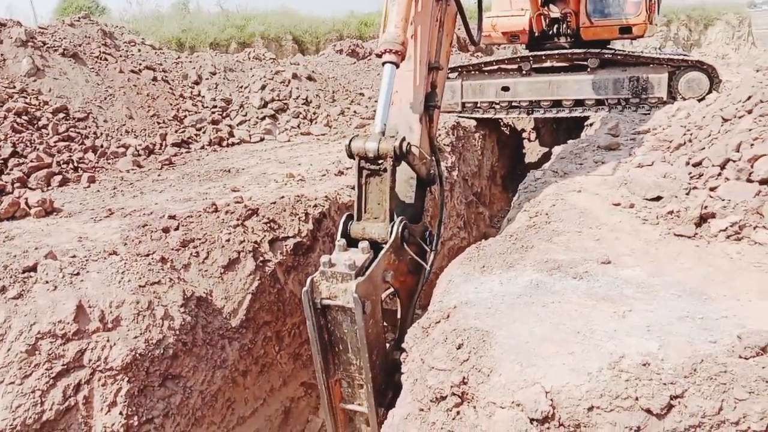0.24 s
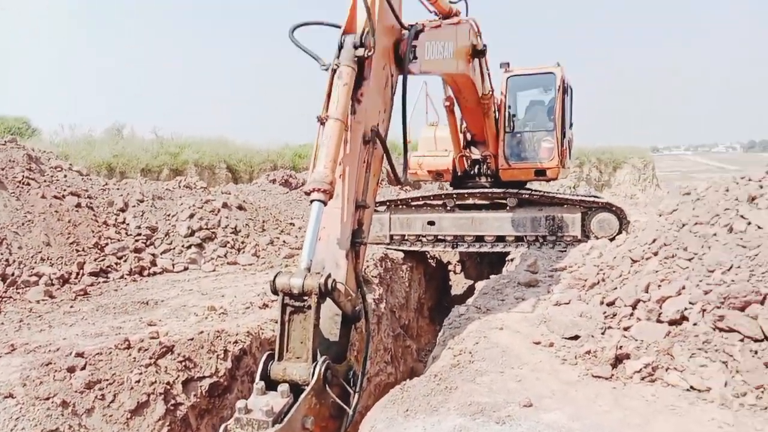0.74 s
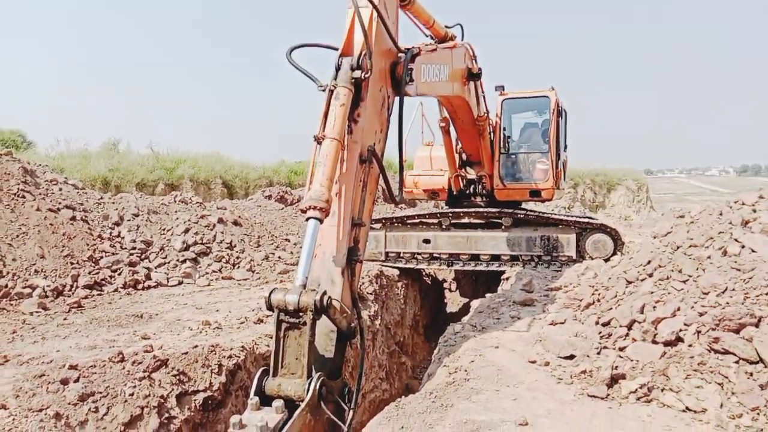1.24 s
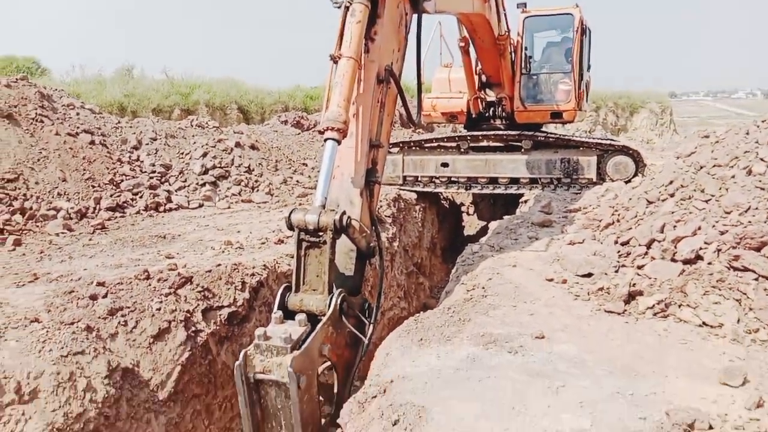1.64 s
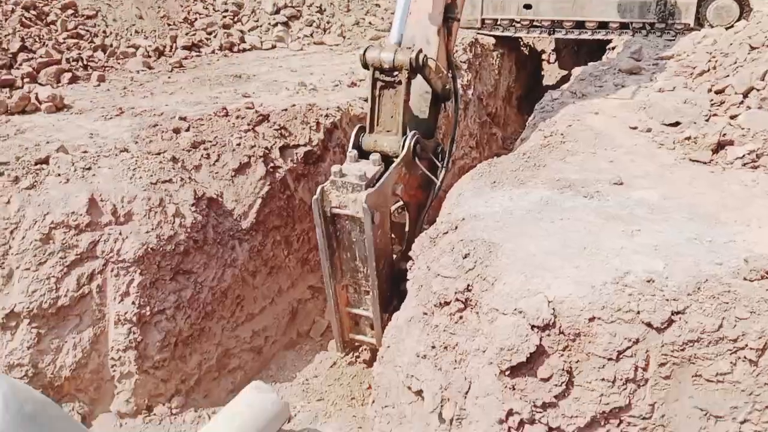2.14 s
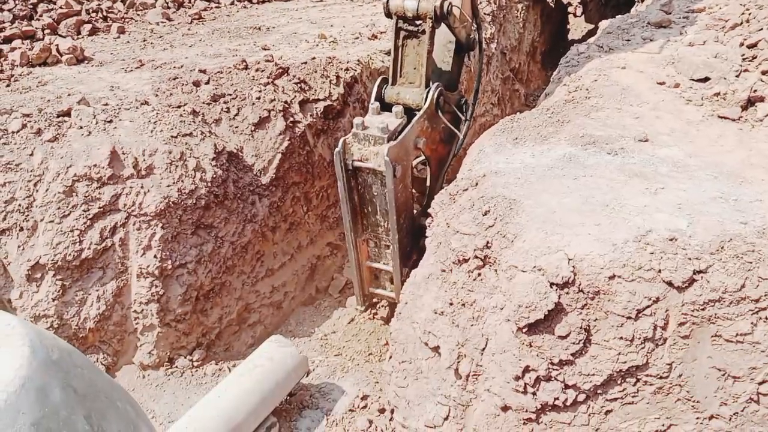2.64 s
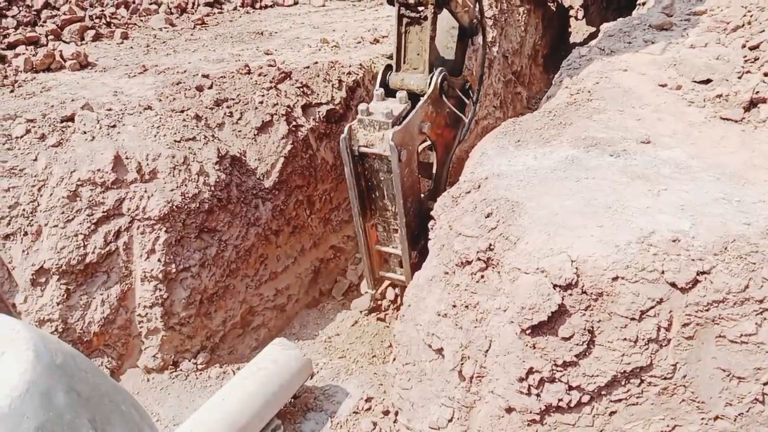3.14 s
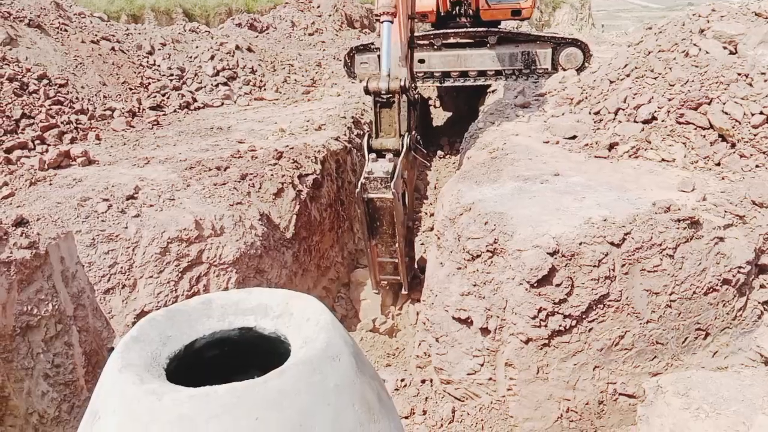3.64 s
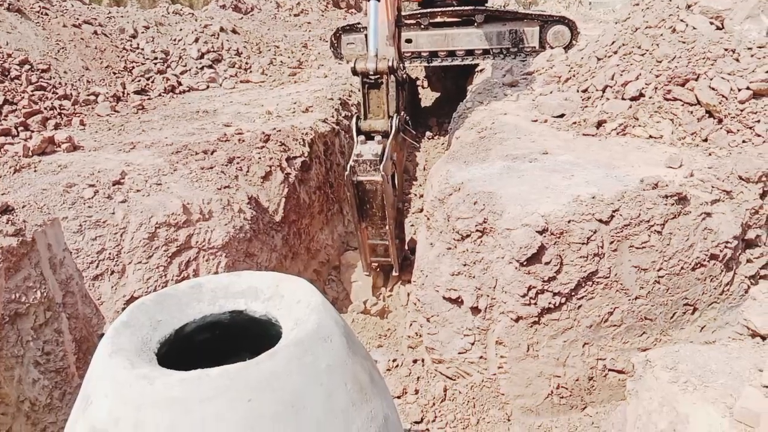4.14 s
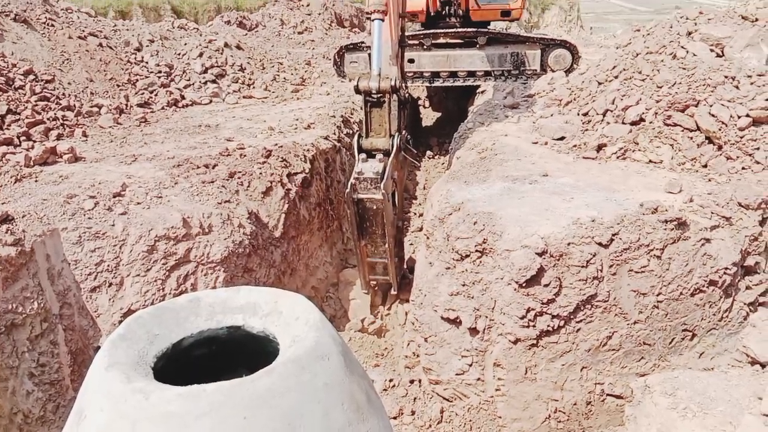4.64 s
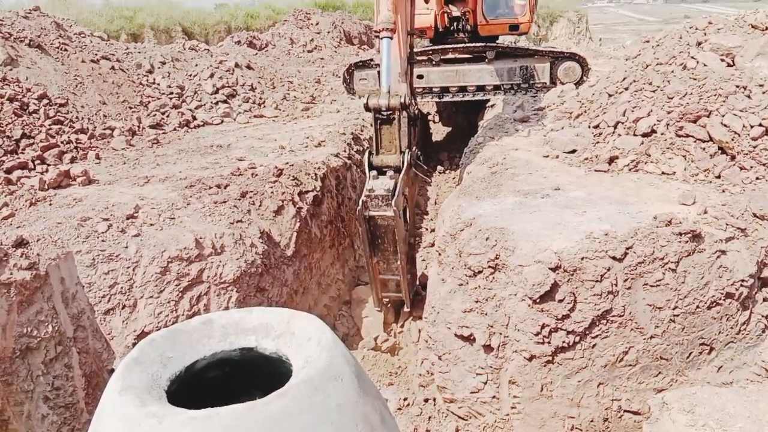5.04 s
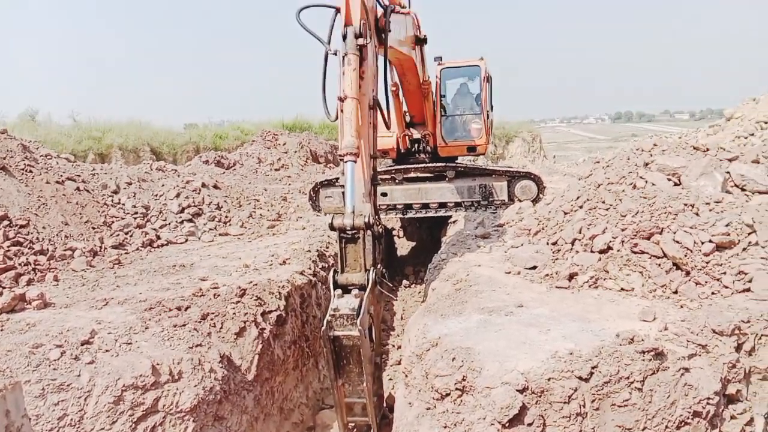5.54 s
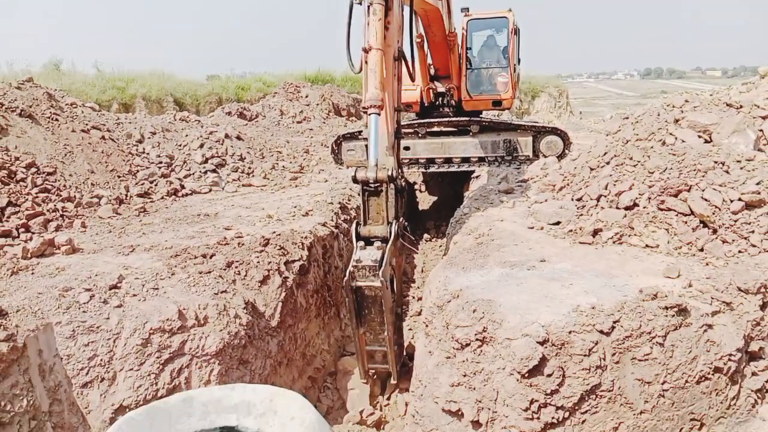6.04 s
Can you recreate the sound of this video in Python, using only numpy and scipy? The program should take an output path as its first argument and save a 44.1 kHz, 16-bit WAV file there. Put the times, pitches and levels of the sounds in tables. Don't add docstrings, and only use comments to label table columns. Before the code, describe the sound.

Rapid, regular hammering of a steel chisel on rock, harsh and distorted on a small close microphone outdoors. Each stroke is a clack and a ringing crash with a dull ground thud. Engine rumble, pump whine and fan air fill the gaps. Around two seconds the hammer rests for a second, with a fading whistle and a metallic knock, then it continues with a shifting ring.

```python
import sys
import numpy as np
from scipy import signal
from scipy.fft import rfft, irfft
from scipy.io import wavfile
from scipy.ndimage import uniform_filter1d

SR = 44100
rng = np.random.default_rng(int(sys.argv[2]) if len(sys.argv) > 2 else 0)


def transcribe(signal):
    frames = np.atleast_2d(signal).T
    limited = np.clip(frames, -1, 1)
    pcm = np.round(limited * 32767).astype(np.int16)
    wavfile.write(sys.argv[1], SR, pcm)


def invert_db(x):
    u = np.asarray(x, float) / 20
    return 10 ** u


N = 277830


def evened(x):
    return x / np.sqrt(np.mean(x ** 2) + 1e-20)


def read(points, hz):
    f, value = np.transpose(points)
    return np.interp(np.log(hz + 1), np.log(f + 1), value)


def add(mix, s, sound):
    part = mix[round(s * SR):][:len(sound)]
    part += sound[:len(part)]


def drift(hz):
    lowpass = signal.butter(2, hz, fs=SR / 64, output="sos")
    coarse = signal.sosfilt(lowpass, rng.standard_normal(N // 64 + 2))
    return evened(np.interp(np.arange(N) / 64, np.arange(len(coarse)), coarse))


def coloured(x, spectrum):
    hz = np.fft.rfftfreq(N, 1 / SR)
    inside = (hz > spectrum[0][0]) & (hz < spectrum[-1][0])
    return evened(irfft(rfft(x) * invert_db(read(spectrum, hz)) * inside, N))


def patchy(patch_db, frames=26, bins=2):
    a, b, patches = rng.standard_normal((N // 128 + 5, 257, 3), dtype=np.float32).T
    patches = uniform_filter1d(patches, size=bins, axis=0)
    patches = evened(uniform_filter1d(patches, size=frames, axis=1))
    spectra = (a + 1j * b) * invert_db(patch_db * patches)
    return evened(signal.istft(spectra, nperseg=512, noverlap=384)[1][:N])


FOOTING_S = [
    2.5,
    3.7,
]


def footing(s):
    return np.searchsorted(FOOTING_S, s)


# blow in seconds, valve clack ahead of it in ms, blow level in dB, chisel ring in dB.
STROKES = [(.099, 37, -0.5, 9.5), (.296, 38, -1, 5.5), (.486, 35, -1, 5.5), (0.677, 36.5, -0.5, 5.5),
           (.867, 36, -1.5, 5), (1.057, 37, -0.5, 10.5), (1.249, 38, -1, 10.5), (1.435, 37.5, -1, 8.5),
           (1.626, 38, -0.5, 10), (1.824, 35.5, -2, 7), (2.833, 5, -1, 4), (3.025, 36.5, -1, 6),
           (3.222, 39, -1, 6.5), (3.41, 36, -0.5, 3), (3.6, 39, -2, 8.5), (3.797, 37.5, -2, 10),
           (3.997, 37.5, -1, -16), (4.182, 39, -1.5, -1), (4.366, 36, -1, 7.5), (4.551, 40, 0, 10),
           (4.735, 36.5, -0.5, 11), (4.921, 37.5, -0.5, 11), (5.104, 36.5, -0.5, 5.5),
           (5.287, 32.5, -2, -6), (5.47, 35.5, -1.5, 3), (5.653, 35.5, -2, -1), (5.835, 34, -2, -27),
           (6.019, 38, -2.5, 5.5), (6.206, 35.5, -1, 4.5)]


def since_blow(early_s):
    t, s = np.arange(N) / SR, np.array(STROKES)[:, 0] - early_s
    return t - s[np.maximum(np.searchsorted(s, t) - 1, 0)]


# time in seconds, pump piston rate in Hz, oil pressure 0-1.
CIRCUIT = [(0, 252.2, 0.71), (1.86, 247.7, 1), (1.95, 247, 0.77), (2.04, 244, 0.55), (2.085, 239.6, 0),
           (2.165, 240, 0.13), (2.2, 240.2, 0.19), (2.3, 240, 0.53), (2.43, 238.9, 0.12),
           (2.47, 240.4, 0.04), (2.68, 238, 0.5), (2.8, 237.5, 0.46), (2.85, 248, 1), (3.7, 250.5, 0.85),
           (4.5, 250, 1), (5.2, 248, 1), (6.3, 251.4, 0.91)]


def circuit():
    s, pump_hz, pressure = np.transpose(CIRCUIT)
    t = np.arange(N) / SR
    pump_hz, pressure = np.interp(t, s, pump_hz), np.interp(t, s, pressure)
    turns = np.cumsum(pump_hz * (1 + 0.004 * drift(11))) / SR
    firings = turns / 9 * 3 + .04 * drift(30)
    return turns, firings, pressure


def loaded(levels_db, pressure):
    idle_db, *full_db = levels_db
    rock = footing(np.arange(N) / SR)
    full_db = uniform_filter1d(np.take(full_db, rock) * 1., size=2000)
    return idle_db + pressure * (full_db - idle_db)


def firing_gate(firings):
    return 1.2 + np.exp(-(firings % 1) / 0.089)


# frequency in Hz, level in dB per Hz.
EXHAUST = [(15, -67), (25, -8), (70, -15), (89, -8.5), (108, -9.5), (167, 0), (249, -1), (380, -19.5),
           (419, -36), (450, -55), (580, -72), (990, -120)]
CLATTER = [(240, -46), (400, -15.5), (490, -1.5), (710, 5.5), (915, 5), (1120, -9), (1250, 4), (1380, -13),
           (1690, -8.5), (1900, -13.5), (2470, -59), (4180, -120)]
CYLINDER_DB = [0, -19, 1, -33, 3, 2]
# level unloaded, then at full pressure on the first, second and third footing, in dB.
EXHAUST_DB = (-37.5, -28, -33, -30.5)
CLATTER_DB = (-48, -31, -52, -35)
FIRING_DB = (-36.5, -39, -49, -39)


def engine(turns, firings, pressure):
    fires = np.diff(np.floor(np.maximum.accumulate(firings)), prepend=0) > 0
    cylinder_db = np.take(CYLINDER_DB, firings.astype(int) % 6)
    strength = invert_db(cylinder_db + 3.0 * rng.standard_normal(N))
    puffs = evened(fires * strength - np.mean(fires * strength))
    exhaust = coloured(puffs + 1.86 * patchy(3.0), EXHAUST)
    clatter = coloured(firing_gate(firings) * patchy(3.0), CLATTER)
    note = np.sin(2 * np.pi * turns / 9 * 3 + .5 * drift(6))
    out = invert_db(loaded(EXHAUST_DB, pressure) + 8.5) * exhaust
    out += invert_db(loaded(CLATTER_DB, pressure) + 8.0) * clatter
    return out + invert_db(loaded(FIRING_DB, pressure) + 3 * drift(5)) * note


# frequency in Hz, level in dB per Hz.
FAN = [(1500, 18.5), (1800, -4.5), (2200, 6), (2600, 1.5), (3000, -15), (3500, -12), (4200, -8),
       (5000, -42), (5600, -31)]
FAN_DB = (-47, -33, -41, -67)


def fan(firings, pressure):
    air = coloured(firing_gate(firings) * patchy(5.5), FAN)
    return invert_db(loaded(FAN_DB, pressure) - 2.0) * air


# multiple of the piston rate, level in dB.
WHINE = [(2, -80), (3, -48.5), (4, -54), (5, -55), (6.5, -56.5), (7, -57), (9, -58), (10.2, -68), (13, -61),
         (43, -81.5)]
# level unloaded, then at full pressure on each footing, in dB.
HUM_DB = (-68, -37, -11.5, -34.5)
WHINE_DB = (4, 5, 9, -24)


def pump(turns, pressure):
    out = invert_db(loaded(HUM_DB, pressure) + 2.5 * drift(4)) * np.sin(2 * np.pi * turns)
    whine_db = loaded(WHINE_DB, pressure)
    for multiple, db in WHINE:
        phase = 2 * np.pi * multiple * turns + .16 * multiple * drift(9)
        out += invert_db(db + whine_db + 5.5 * drift(12)) * np.sin(phase)
    return out


# frequency in Hz, level in dB per Hz.
HISS = [(2940, -25), (5000, -10), (5310, -13), (6430, 0), (7960, 6.5), (8920, -3.5), (11300, -16),
        (12300, -15), (15400, -7), (15900, -20), (16300, -50)]
HISS_DB = (-61, -41, -48, -37.5)


def oil_hiss(pressure):
    stall_s, stall_width_s, stall_db, top_db_per_pressure = .075, .03, -12, 40
    hiss = coloured(patchy(5, frames=45, bins=2), HISS)
    low, top = (signal.sosfiltfilt(signal.butter(3, 9000, kind, fs=SR, output="sos"), hiss)
                for kind in ("low", "high"))
    stall = np.exp(-((since_blow(0) - stall_s) / stall_width_s) ** 2)
    top_db = stall_db * stall + top_db_per_pressure * (pressure - pressure.max()) + 2.7 * drift(16)
    return invert_db(loaded(HISS_DB, pressure) + 2.2 * drift(5)) * (low + invert_db(top_db) * top)


def crash(events, spectrum, fade, lasts_s, tail_db, tail_stretch):
    frames, hz = N // 64 + 5, np.fft.rfftfreq(256, 1 / SR)
    feed = np.zeros(frames + 200)
    shape = signal.windows.tukey(round(lasts_s * SR / 64), .6)
    for s, db, *_ in events:
        feed[round(s * SR / 64):][:len(shape)] += invert_db(2 * db) * shape
    power = np.zeros((len(hz), frames))
    for k, t60_s in enumerate(read(fade, hz)):
        for level_db, time_s in ((0, t60_s), (tail_db, tail_stretch * t60_s)):
            keep = 10 ** (-6 * 64 / SR / time_s)
            power[k] += invert_db(2 * level_db) * signal.lfilter([1 - keep], [1, -keep], feed[:frames])
    colour = invert_db(read(spectrum, hz))
    z = rng.standard_normal((frames, len(hz), 2)) @ [1, 1j]
    rattle = evened(uniform_filter1d(rng.standard_normal((frames, len(hz))), size=24, axis=0))
    z = (z * invert_db(3.5 * rattle - 1.5)).T * np.sqrt(power) * evened(colour)[:, None]
    return signal.istft(z, nperseg=256, noverlap=192)[1][:N] / np.sqrt(len(hz))


def ring(modes, s, extra_db, rise_s, length_s):
    t = np.arange(round(length_s * SR)) / SR
    hz, t60_s, *levels_db = np.transpose(modes)[..., None]
    luck = rng.standard_normal((4, len(modes), 1))
    hz = hz * (1 + 0.0025 * luck[2])
    waver_db = 3 * np.sin(2 * np.pi * 17 * t * (1 + .5 * luck[3]) + 3 * luck[2])
    db = levels_db[footing(s)] + extra_db + 2.17 * luck[1] + waver_db - 60 * t / t60_s
    tones = invert_db(db) * np.cos(2 * np.pi * hz * (t - .004) + luck[0])
    onset = 1 - np.exp(-(t / rise_s) ** 2)
    return (tones * onset).sum(0) * np.clip(8 * (1 - t / length_s), 0, 1)


# frequency in Hz, t60 in seconds, level in dB on the first, second and third footing.
CLACK_MODES = [(708.3, 0.086, 3.5, -0.5, -0.5), (874, 0.03, -29, -15, -7.5), (1390, 0.24, -14, -29, -22),
               (2618, 0.024, -23, 7, 13.5), (3060, .03, -4, -4, -2), (3170, .035, -4, -4, -1),
               (3280, .025, -8, -8, -8), (3570, .04, -14, -1, -27), (5480, 0.07, -5, -27, -8),
               (7130, 0.024, -29, 2, 10), (7950, 0.13, -2, -13, -27), (8290, 0.055, -7, -31, -0.5),
               (8570, 0.022, 4, -19, 11)]
# frequency in Hz, level in dB per Hz.
CLACK_CRASH = [(240, -55), (400, -26), (742, -1.5), (1680, -13.5), (2840, -7), (3120, -7.5), (4650, -16),
               (8240, -4), (9920, -24), (14800, -28.5), (16000, -47)]
# frequency in Hz, t60 in seconds.
CLACK_FADE = [(600, 0.17), (3000, 0.1), (8000, 0.047), (14000, 0.1)]
CLACK_DB = [-13.5, -15, -16.3]
CLACK_RING_DB = [11.5, 11.5, 13.5]


def clacks():
    events = []
    for s, lead_ms, *_ in STROKES:
        if lead_ms > 10:
            a, b = rng.standard_normal(2) * [.8, 1.2]
            events.append((s - lead_ms * 1e-3, CLACK_DB[footing(s)] + a, CLACK_RING_DB[footing(s)] + b))
    out = invert_db(2.5) * crash(events, CLACK_CRASH, CLACK_FADE, lasts_s=0.0096, tail_db=-19, tail_stretch=2.9)
    near_3100 = abs(np.array(CLACK_MODES)[:, :1] - 3100) < 200
    for s, db, ring_db in events:
        tones = ring(CLACK_MODES, s, ring_db * near_3100, rise_s=.005, length_s=0.1)
        add(out, s - .0005, invert_db(db - 1.5) * tones)
    return out


# frequency in Hz, t60 in seconds, level in dB on the first, second and third footing.
BLOW_MODES = [(304, 0.054, -7.5, -4, -15.5), (638, 0.15, -23, -3.5, -13), (690, 0.25, -12, -10.5, -28),
              (884, 0.12, -16, 2.5, -6.5), (1009, 0.12, -13, -35, -9.5), (860, 0.01, 7, -13, 1),
              (1100, 0.015, 13.5, -22, -24), (1062, 0.089, -14, -39, -65), (1236, 0.19, -7.5, -33, -38),
              (1338, 0.24, -24.5, -16, -17), (1430, 0.087, -17, -5, -9.5), (1570, 0.095, -7, -34, -35),
              (1740, 0.13, -15.5, -40, -15.5), (2320, 0.013, -18, -28, -31), (248, 0.57, -25, -38, -23),
              (2417, .12, -12, -1, -4), (2449, .12, -17, -2, -17), (2503, .1, -14, -11, -3),
              (3709, .24, -13, -20, -31), (3560, 0.038, -12, -7, -27), (4515, 0.14, -24, -21.5, -19.5),
              (6170, 0.038, -21, -4, -15), (7160, 0.095, -10.5, -17, -11.5), (7550, 0.09, -11.5, -29, -29)]
# frequency in Hz, level in dB per Hz.
BLOW_CRASH = [(120, 2.5), (200, -13), (482, -1.5), (986, 2), (1940, -4.5), (2420, 6), (2800, -3),
              (3970, -9.5), (5840, -10.5), (7140, -4.5), (12200, -31), (16000, -36)]
# frequency in Hz, t60 in seconds.
BLOW_FADE = [(300, 0.11), (800, 0.12), (2000, 0.056), (5000, 0.057), (7500, 0.048), (10000, 0.034),
             (14000, 0.025)]
HOUSING_DB = [2, -0.9, 5]
THUD_DB = [-2.3, -6.5, 1.5]


def blows():
    early = np.array(STROKES)[:, [0, 2]] - [.003, 0]
    out = invert_db(-9.0) * crash(early, BLOW_CRASH, BLOW_FADE, lasts_s=.019, tail_db=-3, tail_stretch=3.2)
    t = np.arange(round(.08 * SR)) / SR
    thud = np.sin(2 * np.pi * 135 * t) * invert_db(-60 * t / 0.036) * (1 - np.exp(-t / 0.005))
    is_housing = np.array(BLOW_MODES)[:, :1] < 2000
    rise_s = np.where(is_housing, .004, .012)
    for s, _, db, chisel_db in STROKES:
        extra_db = np.where(is_housing, HOUSING_DB[footing(s)], chisel_db)
        add(out, s - .004, invert_db(db - 9) * ring(BLOW_MODES, s, extra_db, rise_s, length_s=0.148))
        add(out, s - .002, invert_db(db + THUD_DB[footing(s)] - 3.0) * thud)
    return out * (since_blow(.001) < .6)


def whistle(rows, fuzz):
    s, hz, db = np.transpose(rows)
    t = np.arange(s[0], s[-1], 1 / SR)
    wander = np.cumsum(rng.standard_normal(len(t))) * fuzz
    phase = 2 * np.pi * np.cumsum(np.interp(t, s, hz)) / SR
    return invert_db(np.interp(t, s, db)) * np.sin(phase + wander)


# first frequency in Hz, rise in Hz, level in dB.
SQUEALS = [(3705, 5.4, -38), (3860, 113, -33), (4090, 180, -37.5)]


def refill_squeals():
    out = np.zeros(N)
    start_s, peak_s, end_s = 0.033, 0.088, 0.15
    times_s = np.array([start_s, peak_s, end_s - .01, end_s])
    for s, *_ in STROKES:
        for hz, rise_hz, db in SQUEALS:
            a, b = rng.standard_normal(2)
            glide_hz = hz + rise_hz * ((times_s - start_s) / (end_s - start_s) + 0.22 * a)
            swell_db = db + 2.5 * b + np.array([-18, 0, -10, -18])
            add(out, s + start_s, whistle(np.transpose([times_s, glide_hz, swell_db]), fuzz=0.065))
    return out


# time in seconds, frequency in Hz, level in dB.
RELIEF = [
    (1.901, 3760, -52),
    (1.96, 3850, -40),
    (2.06, 3850, -48),
    (2.11, 3840, -59),
]


def relief_valve():
    out = np.zeros(N)
    add(out, RELIEF[0][0], whistle(RELIEF, fuzz=0.022))
    return out


# time in seconds, level in dB, ring in Hz, t60 in seconds.
PIN = [(2.277, -24.5, 2740, 0.09), (2.286, -16, 4500, 0.023), (2.283, -20, 1017, 0.099),
       (2.282, -28, 3460, 0.082), (2.285, -26.5, 7350, 0.058), (2.288, -32, 11100, .03),
       (2.319, -43, 6530, 0.052)]
# time in seconds, level in dB, t60 in seconds.
SNAP = (2.277, -20.5, 0.1)
SQUEAK = (2.238, .034, 4450, -42)


def pin():
    out, t = np.zeros(N), np.arange(round(.1 * SR)) / SR
    for s, db, hz, t60_s in PIN:
        band = signal.butter(1, [0.96 * hz, 0.97 * hz], "bandpass", fs=SR, output="sos")
        tone = evened(signal.sosfilt(band, rng.standard_normal(len(t))))
        add(out, s, invert_db(db - 60 * t / t60_s) * tone)
    s, db, t60_s = SNAP
    knock = coloured(rng.standard_normal(N), BLOW_CRASH[:-1])[:len(t)]
    add(out, s, invert_db(db - 60 * t / t60_s) * np.minimum(t / 0.0089, 1) * knock)
    s, length_s, hz, db = SQUEAK
    t = np.arange(round(length_s * SR)) / SR
    add(out, s, invert_db(db) * np.sin(2 * np.pi * hz * t) * signal.windows.tukey(len(t), .4))
    return out


def scene():
    turns, firings, pressure = circuit()
    machine = engine(turns, firings, pressure) + fan(firings, pressure)
    machine += pump(turns, pressure) + oil_hiss(pressure)
    breaker = invert_db(15) * (clacks() + blows())
    return (machine + breaker + refill_squeals() + relief_valve() + pin())[None]


def band_limit(x):
    return signal.sosfilt(signal.butter(12, 16460, fs=SR, output="sos"), x)


def record(dry):
    mic = signal.sosfilt(signal.butter(3, 62, "highpass", fs=SR, output="sos"), dry)
    treble = signal.sosfilt(signal.butter(2, 1500, "highpass", fs=SR, output="sos"), mic[0])
    power_db = 10 * np.log10(abs(uniform_filter1d(treble ** 2, size=130)) + 1e-12)
    over_db = np.clip(1.5 * (power_db + 17), 0, 16)
    starts = np.round(np.arange(.008, N / SR - .005, .02) * SR).astype(int)
    block_db = np.maximum.reduceat(over_db, starts + 130)
    held_db = np.maximum(block_db, np.roll(block_db, 1))
    fall_db = np.arange(len(starts)) * 3.14
    duck_db = np.maximum.accumulate(held_db + fall_db) - fall_db
    duck_db = duck_db[np.maximum(np.searchsorted(starts, np.arange(N)) - 1, 0)]
    x = mic / invert_db(uniform_filter1d(duck_db, round(.005 * SR)))
    x = x / (1 + abs(x / .46) ** 8) ** (1 / 8)
    x = signal.sosfilt(signal.butter(2, 45, "highpass", fs=SR, output="sos"), x)
    x = signal.sosfilt(signal.butter(1, 13000, fs=SR, output="sos"), x)
    x = signal.oaconvolve(x, signal.firwin(255, 15600, fs=SR)[None], "same")
    return band_limit(x)


dry = scene()
out = record(dry)
transcribe(out)
```